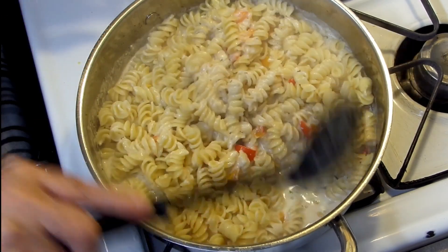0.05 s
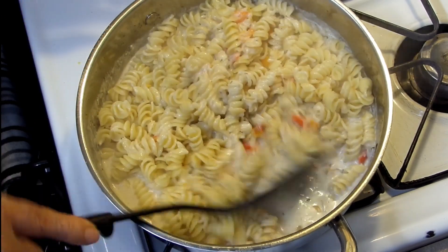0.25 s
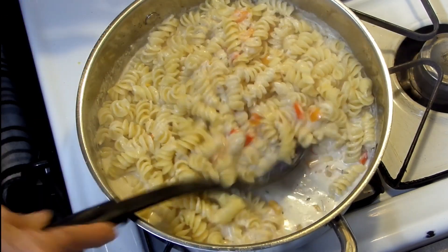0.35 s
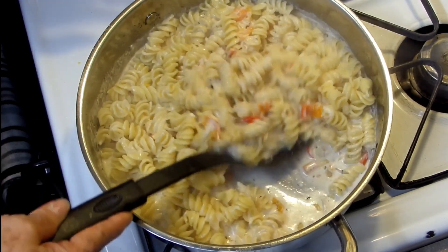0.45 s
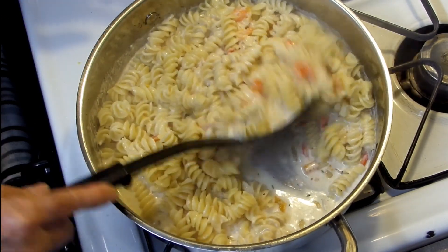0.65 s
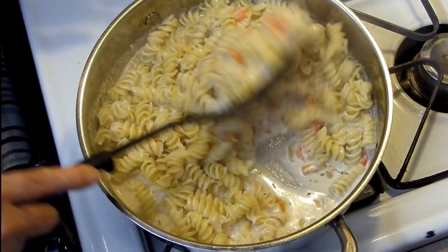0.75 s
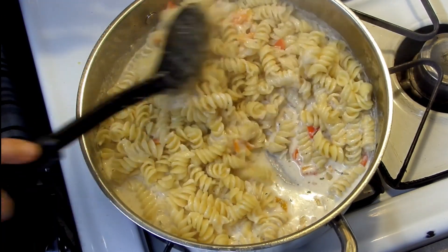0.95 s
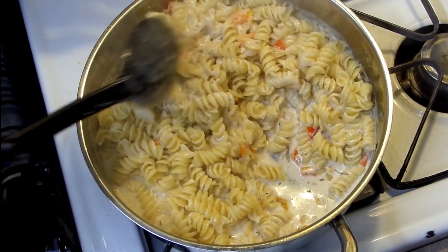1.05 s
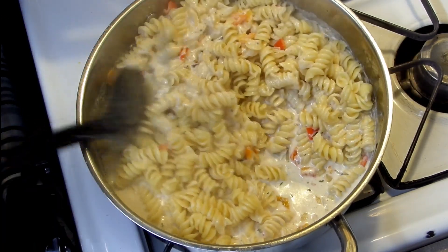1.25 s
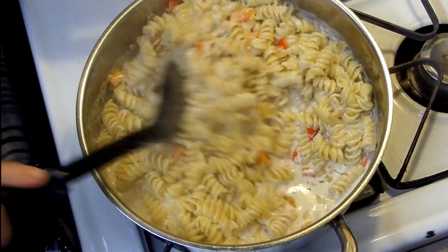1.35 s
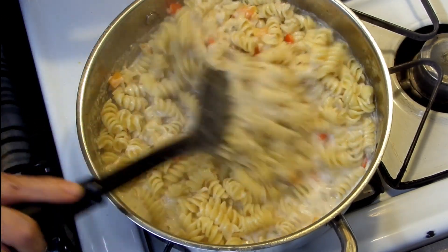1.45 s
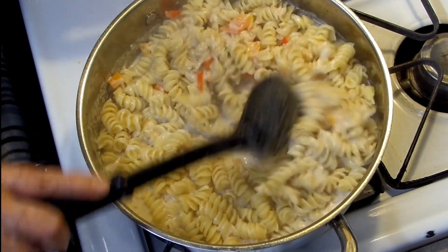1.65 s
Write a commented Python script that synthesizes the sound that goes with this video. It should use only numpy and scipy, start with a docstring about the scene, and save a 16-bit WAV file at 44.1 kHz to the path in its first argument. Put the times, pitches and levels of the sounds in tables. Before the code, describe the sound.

A plastic spoon stirring creamy pasta in a metal skillet, with hollow knocks and wet squelches

```python
"""In a kitchen, a plastic spoon stirs pasta in cream sauce in a metal skillet on a gas stove.
It knocks the pan four times: shaped noise makes the crack and the kitchen's answer, and decaying
sine waves make the ring of pan and stove top. Bands of noise make the spoon's low scrapes, the
smacks of sauce and the rubbing pasta. Clicks through resonators squelch, and a flickering bright
hiss is the sizzle. Steady noise and three faint tones lie underneath."""
import sys
import numpy as np
from scipy import signal
from scipy.fft import rfft, irfft
from scipy.io import wavfile

SR = 44100
rng = np.random.default_rng(int(sys.argv[2]) if len(sys.argv) > 2 else 0)


def put_to_file(sound):
    """Save the sound as 16-bit audio at rate SR, in the file named by the first command-line argument."""
    columns = np.atleast_2d(sound).T  # one column per channel
    safe = np.clip(columns, -1, 1)
    whole_steps = np.round(safe * 32767)
    wavfile.write(sys.argv[1], SR, whole_steps.astype(np.int16))


N = 74970
T = np.arange(N) / SR  # time [s]

# Centres of the eight pitch registers a knock can drive: pitch_hz [Hz]
REGISTERS_HZ = (110, 200, 400, 900, 1650, 2800, 6300, 12000)
# Spoon on pan: start_s [s], build_up_s [s], ring_length [factor], crack_db [dB],
# then the drive of each register, low to high [dB per octave]
KNOCKS = [ (0.1917, 0.00084, 1.51, 3.5, -53, -34, -33, -31, -38, -42, -27, -37),
          (0.2420, 0.0015, 1.014, 0.5, -26, -30.5, -22.5, -12.5, -11, -15, -13, -32.5),
          (0.4785, 0.0013, 0.75, -3, -21.5, -26.5, -27, -15.5, -23.5, -37, -25.5, -33.5),
          (1.3371, 0.00033, 0.89, 3.5, -42, -23, -30.5, -21, -18, -23, -29, -45.5)]
# Ways the skillet rings: pitch_hz [Hz], t60_s (time to fall 60 dB, before ring_length) [s],
# then level_db under each of the four knocks [dB]
SKILLET_MODES = [ (547, .22, -51, -28, -48, -39), (646, .22, -34, -25, -22, -42),
                 (735, .14, -42, -24, -30, -27), (800, .16, -45, -22, -40, -36),
                 (860, .17, -50, -18, -37, -48), (940, .18, -31, -25, -33, -36),
                 (1033, .18, -39, -16, -39, -36), (1089, .13, -56, -30, -40, -24),
                 (1234, .13, -50, -34, -33, -27), (1275, .12, -57, -26, -20, -36),
                 (1420, .12, -50, -48, -36, -22), (1521, .09, -43, -31, -26, -24),
                 (1610, .09, -40, -23, -23, -23), (1725, .13, -50, -20, -32, -38),
                 (1812, .13, -51, -16, -33, -35), (1911, .11, -60, -21, -51, -43),
                 (2148, .09, -45, -20, -47, -23), (3195, .1, -55, -34, -57, -31),
                 (4150, .12, -56, -29, -57, -44), (5954, .14, -43, -26, -47, -60),
                 (6648, .14, -41, -25, -45, -55), (7251, .15, -50, -33, -49, -55)]
# Ways the stove top and grate ring: same columns; all levels are raised by STOVE_DB
STOVE_MODES = [(112.4, 0.39, -46, -43, -32, -44), (137.7, 0.35, -43, -58, -40, -34),
               (197.2, 0.16, -40.5, -28, -21, -30), (281.2, 0.63, -34, -45, -48, -43.5),
               (303, 0.46, -37, -37.5, -45.5, -40), (354, 0.47, -32, -27, -44, -38),
               (401, 0.32, -35.5, -25.5, -29.5, -42.5)]
SKILLET_DB, STOVE_DB = 0, 0.5
BUILD_CYCLES = 2.9  # a mode needs a few cycles to reach full swing

# Fading of the crowd of weak modes: pitch_hz [Hz], t60_s (before ring_length) [s]
DENSE_T60 = [(100, 0.13), (300, 0.34), (900, 0.23), (2000, 0.14), (5000, 0.086), (8000, 0.088),
             (13000, 0.034)]
DENSE_DB, DENSE_ABOVE_HZ = -6, 320  # weak modes thin out toward the bass
CRACK_ABOVE_HZ, CRACK_T60_S = 3200, 0.045  # the first moment of contact

# Strength of the kitchen's reverberation: pitch_hz [Hz], level_db [dB]
KITCHEN_DB = [(100, -14.5), (300, -12.5), (900, -23.5), (2500, -23), (7000, -22.5), (13000, -37)]
# Fading of the kitchen's reverberation: pitch_hz [Hz], t60_s [s]
KITCHEN_T60 = [(100, 0.57), (400, 0.76), (1500, 0.41), (6000, 0.4), (13000, 0.17)]
KITCHEN_BUILD_S = 0.011

# Spoon dragging over the pan floor: middle_s [s], half_length_s [s], level_db [dB], pitch_hz [Hz]
DRAGS = [(0.067, 0.094, -62.5, 214), (0.64, 0.054, -53.5, 410), (1.093, 0.072, -57.5, 290)]
DRAG_WIDTH_OCTAVES = 0.4

# Sauce films snapping between noodles: start_s [s], level_db (before SMACK_TRIM_DB) [dB],
# pitch_hz [Hz], width [octaves], t60_s [s]
SMACKS = [(.0897, -49, 12000, 0.64, 0.0097), (0.1117, -43.5, 9800, 0.28, 0.012),
          (0.3155, -35.5, 8000, 0.36, 0.053), (0.3406, -28.5, 4320, 0.96, 0.0086),
          (0.348, -39, 11000, .6, 0.026), (0.365, -39, 3160, 0.21, 0.016), (.412, -33, 3900, 1.0, 0.098),
          (0.42, -38, 7060, 1, 0.075), (0.445, -37.5, 3370, 0.85, 0.026), (0.591, -45.5, 7000, 0.47, 0.017),
          (.6712, -37.5, 13100, 0.53, 0.027), (.680, -40.5, 1450, 0.67, 0.032),
          (0.799, -47, 10800, .5, 0.028), (0.8837, -41, 13100, 0.27, 0.005),
          (0.9025, -39.5, 11500, 0.42, 0.019), (0.962, -45, 11000, 1, .04),
          (.9966, -41.5, 5970, 0.5, 0.044), (1.011, -46, 5000, 1.0, .04), (1.0268, -42, 5160, .9, .03),
          (1.033, -39, 1580, 0.26, 0.034), (1.056, -40, 9300, 0.4, 0.025), (1.073, -46, 11500, 0.39, .035),
          (1.1344, -48, 12400, 0.73, .03), (1.2912, -39, 12040, 1, 0.058), (1.297, -42, 4700, 0.27, 0.16),
          (1.3046, -37, 4570, 0.48, 0.02), (1.313, -41.5, 1880, .6, 0.048),
          (1.432, -38.5, 5930, 0.22, 0.018), (1.4672, -32, 5100, 0.2, 0.016),
          (1.549, -45, 4840, 0.14, 0.021)]
SMACK_TRIM_DB, SMACK_RISE_S = -3.5, 0.00043
SNAP_DB, SNAP_T60_S = 1, 0.003  # the film breaks
SMACK_ROOM_DB, SMACK_ROOM_T60_S = -14.5, 0.24

# Loudness of pasta sliding ahead of the spoon: time_s [s], level_db [dB]
PUSH = [(0, -50), (.07, -57), (.17, -58.5), (.4, -44), (.66, -50.5), (.86, -57), (.95, -57.5),
        (1.03, -46.5), (1.12, -57.5), (1.26, -58.5), (1.34, -45.5), (1.43, -39.5), (1.54, -43.5),
        (1.7, -50.5)]
# Tone of the pasta: pitch_hz [Hz], relative level_db [dB per octave]
PASTA_COLOUR = [(100, -14), (300, -0.5), (700, 1), (1400, 3), (2200, 0.5), (3000, -7), (5000, 0),
                (9000, -9), (15000, -34)]
SQUELCH_PER_S, SQUELCH_SPREAD_DB = 700, 2
SQUELCH_CYCLES = 18.4  # cycles to fall 60 dB
SQUELCH_DB, SLIDE_DB = -8, -5

# Loudness of sauce on hot metal: time_s [s], level_db [dB]
SIZZLE_LEVEL = [(0, -50.5), (.06, -59), (.18, -71), (.29, -43.5), (.38, -48), (.55, -51.5), (.7, -52.5),
                (.86, -59.5), (.99, -51.5), (1.08, -56), (1.17, -61), (1.28, -57.5), (1.36, -48.5),
                (1.43, -39.5), (1.55, -43), (1.7, -47.5)]
# Tone of the sizzle: pitch_hz [Hz], relative level_db [dB per octave]
SIZZLE_COLOUR = [(1000, -25), (2500, -10), (5000, -10), (8000, -5.5), (11000, -3), (13800, 0.5), (16000, 1)]
SIZZLE_FLICKER_DB, SIZZLE_FLICKER_HZ = -2, 500
SIZZLE_SPITS_PER_S, SIZZLE_SPIT_DB, SIZZLE_SPIT_S = 150, -10.5, 0.0006

# Room and burner noise: pitch_hz [Hz], level_db [dB per octave]
FLOOR = [(25, -78), (50, -66.5), (110, -65.5), (250, -67), (500, -63), (1200, -75), (3000, -70.5),
         (8000, -71), (15000, -91)]
# Hum of kitchen appliances: pitch_hz [Hz], level_db [dB]
HUM = [(119, -66), (187, -68.5), (280, -72)]

EDGES_HZ = 22 * 2 ** (np.arange(30) / 3)  # third-octave band edges
CUTOFF_HZ = 15700


def from_db(db):
    """Turn decibels into gain."""
    return 10 ** (np.asarray(db) / 20)


def rms_one(x):
    """Scale to an average power of one."""
    return x / np.sqrt(np.mean(x ** 2) + 1e-20)


def at_hz(points, hz):
    """Read a table at a pitch, with pitch on a logarithmic axis."""
    table_hz, values = np.transpose(points)
    return np.interp(np.log(hz), np.log(table_hz), values)


def gain_in_time(points):
    """Read a loudness curve as a gain over the whole scene."""
    return from_db(np.interp(T, *np.transpose(points)))


def dying(age, rise_s, t60):
    """A straight rise, then an exponential decay that falls 60 dB in t60 seconds."""
    rise = np.clip(age / max(rise_s, 1e-5), 0, 1)
    return rise * np.exp(-np.log(1000) * np.maximum(age - rise_s, 0) / t60)


def fft_hz(size):
    """Pitches of the spectrum bins, kept above zero for the logarithms."""
    return np.maximum(np.arange(size // 2 + 1) * SR / size, 10)


def shaped_noise(shape, size):
    """White noise with its spectrum multiplied by a shape."""
    return irfft(rfft(rng.standard_normal(size)) * shape, size)


def coloured(spectrum):
    """Steady noise with a given level per octave."""
    hz = fft_hz(N)
    white_to_octaves = np.sqrt(SR / 2 / np.log(2) / hz)
    return shaped_noise(from_db(at_hz(spectrum, hz)) * white_to_octaves, N)


def evened(x):
    """Smooth out the chance swells of a narrow noise."""
    swell = np.abs(signal.hilbert(x))
    return x / (swell + .3 * swell.mean())


def noise_bands():
    """Even third-octave noises as (centre Hz, signal), with unit power per octave."""
    bands = []
    for lo, hi in zip(EDGES_HZ, EDGES_HZ[1:]):
        band = signal.butter(2, [lo, hi], "band", fs=SR, output="sos")
        # a quarter second of run-in lets the filter settle
        noise = signal.sosfilt(band, rng.standard_normal(N + SR // 4))[-N:]
        bands.append((np.sqrt(lo * hi), rms_one(evened(noise)) / np.sqrt(3)))
    return bands


def knocks():
    """Each knock cracks, sets a crowd of weak modes going, and dies away in the kitchen."""
    out, near, far = np.zeros(N), noise_bands(), noise_bands()
    for start_s, rise_s, length, crack_db, *drive_db in KNOCKS:
        i = int(start_s * SR)
        age = T[:N - i]
        drive = list(zip(REGISTERS_HZ, drive_db))
        for (hz, direct), (_, diffuse) in zip(near, far):
            rise = max(rise_s, 1 / hz)
            thinning = hz / np.hypot(hz, DENSE_ABOVE_HZ)
            body = from_db(DENSE_DB) * thinning * dying(age, rise, at_hz(DENSE_T60, hz) * length)
            crack = from_db(crack_db) * dying(age, rise, CRACK_T60_S) * hz / (hz + CRACK_ABOVE_HZ)
            room_decay = dying(age, KITCHEN_BUILD_S, at_hz(KITCHEN_T60, hz))
            room = from_db(at_hz(KITCHEN_DB, hz)) * room_decay
            radiated = np.clip((hz / 110) ** 4, .09, 1)  # the lowest bass comes out weakly
            sound = np.hypot(body, crack) * direct[i:] + room * diffuse[i:]
            out[i:] += radiated * from_db(at_hz(drive, hz)) * sound
    return out


def ringing(modes, level_db):
    """A body's modes are fading sines, each driven more or less by where the spoon lands."""
    out = np.zeros(N)
    for k, (start_s, rise_s, length, *_) in enumerate(KNOCKS):
        i = int(start_s * SR)
        age = T[:N - i]
        for hz, t60, *struck_db in modes:
            envelope = dying(age, max(rise_s, BUILD_CYCLES / hz), t60 * length)
            tone = np.sin(2 * np.pi * (hz * age + rng.random()))
            out[i:] += from_db(level_db + struck_db[k]) * envelope * tone
    return out


def drags():
    """The spoon rubs along the bottom and the pan answers with a low, soft scrape."""
    out, hz = np.zeros(N), fft_hz(N)
    for middle_s, half_s, db, centre_hz in DRAGS:
        shape = 1 / (1 + (np.log2(hz / centre_hz) / DRAG_WIDTH_OCTAVES) ** 2)
        stroke = np.exp(-((T - middle_s) / half_s) ** 2)
        out += from_db(db) * stroke * rms_one(shaped_noise(shape, N))
    return out


def smacks():
    """Each film breaks with a tiny snap and a short wet burst round one pitch, with a faint room tail."""
    out, size = np.zeros(N + SR), SR // 4
    age, hz = T[:size], fft_hz(size)
    snap = from_db(SNAP_DB) * dying(age, SMACK_RISE_S, SNAP_T60_S)
    room = from_db(SMACK_ROOM_DB) * dying(age, KITCHEN_BUILD_S / 2, SMACK_ROOM_T60_S)
    for start_s, db, centre_hz, width, t60 in SMACKS:
        hump = (1 + .5 * (np.log2(hz / centre_hz) / width) ** 2) ** -2
        shape = hump * np.sqrt(centre_hz / (hz + centre_hz))
        burst = rms_one(evened(shaped_noise(shape, size)))
        envelope = snap + dying(age, SMACK_RISE_S, t60) + room
        i = int(start_s * SR)
        out[i:i + size] += from_db(db + SMACK_TRIM_DB) * burst * envelope
    return out[:N]


def pasta():
    """Sliding noodles rub softly and squeeze out tiny air pockets that ring a few cycles."""
    sizes = from_db(SQUELCH_SPREAD_DB * np.minimum(rng.exponential(1, N), 4)) * rng.choice([-1, 1], N)
    clicks = sizes * (rng.random(N) < SQUELCH_PER_S / SR)
    pitches = np.geomspace(500, 9000, 24)
    dealt = rng.integers(0, len(pitches), N)  # each click goes to one pitch
    pockets = np.zeros(N)
    for k, hz in enumerate(pitches):
        r = np.exp(-np.log(1000) * hz / (SQUELCH_CYCLES * SR))  # loss per sample
        w = 2 * np.pi * hz / SR
        resonator = [1, -2 * r * np.cos(w), r * r]
        rung = signal.lfilter([1, 0, -1], resonator, clicks * (dealt == k) + 1e-18)
        pockets += from_db(at_hz(PASTA_COLOUR, hz)) * rms_one(rung)
    highpass = signal.butter(2, 100, "high", fs=SR, output="sos")
    rub = signal.sosfilt(highpass, coloured(PASTA_COLOUR))
    mix = from_db(SQUELCH_DB) * rms_one(pockets) + from_db(SLIDE_DB) * rms_one(rub)
    return gain_in_time(PUSH) * mix


def sizzle():
    """A fine, bright frying hiss that flickers and spits as bubbles burst."""
    lowpass = signal.butter(1, SIZZLE_FLICKER_HZ, fs=SR, output="sos")
    flicker = rms_one(signal.sosfilt(lowpass, rng.standard_normal(N)))
    bursts = (rng.random(N) < SIZZLE_SPITS_PER_S / SR) * np.minimum(rng.exponential(1, N), 3)
    fade = np.exp(-1 / (SIZZLE_SPIT_S * SR))
    spits = rms_one(signal.lfilter([1], [1, -fade], bursts + 1e-18))
    swell = from_db(SIZZLE_FLICKER_DB * flicker) + from_db(SIZZLE_SPIT_DB) * spits
    return gain_in_time(SIZZLE_LEVEL) * rms_one(coloured(SIZZLE_COLOUR) * swell)


def background():
    """Burner and room noise is steady, with a faint appliance hum of pure tones."""
    out = coloured(FLOOR)
    for hz, db in HUM:
        out += from_db(db) * np.sqrt(2) * np.sin(2 * np.pi * (hz * T + rng.random()))
    return out


def scene():
    """Everything as heard from just above the pan, in one channel."""
    pan = knocks() + ringing(SKILLET_MODES, SKILLET_DB) + ringing(STOVE_MODES, STOVE_DB) + drags()
    return (pan + smacks() + pasta() + sizzle() + background())[None]


def record(dry):
    """The highest peaks are rounded and the top of the treble is cut."""
    rounded = 1.5 * np.tanh(dry / 1.5)
    return signal.sosfilt(signal.cheby1(14, .2, CUTOFF_HZ, fs=SR, output="sos"), rounded)


dry = scene()
out = record(dry)
put_to_file(out)
```